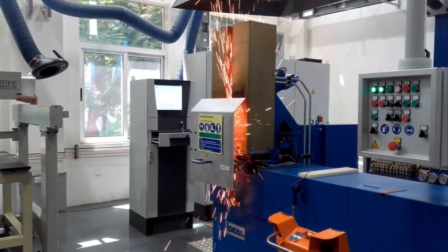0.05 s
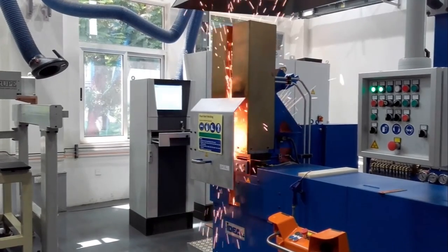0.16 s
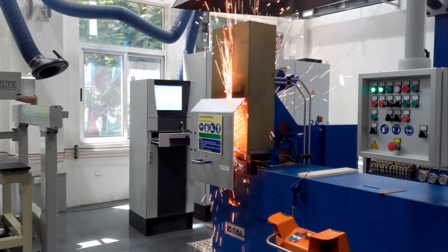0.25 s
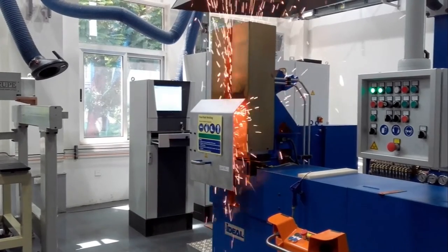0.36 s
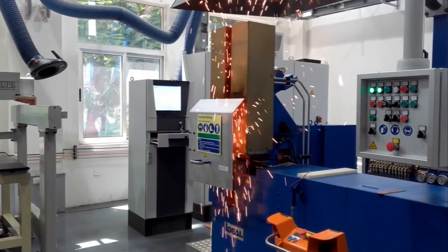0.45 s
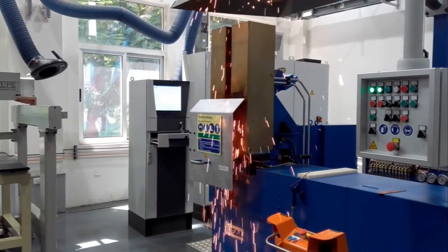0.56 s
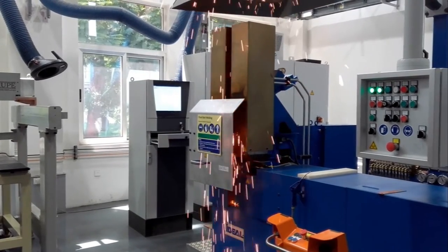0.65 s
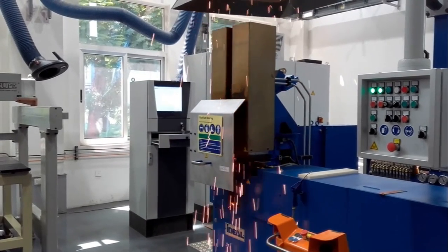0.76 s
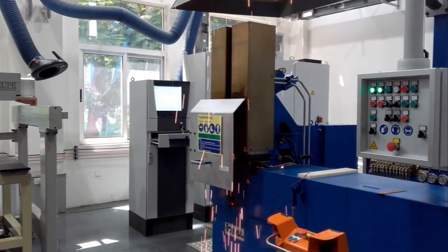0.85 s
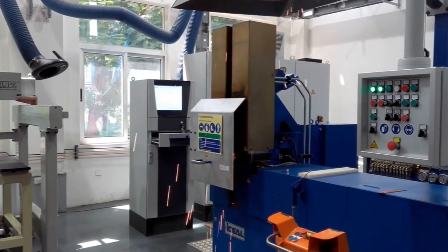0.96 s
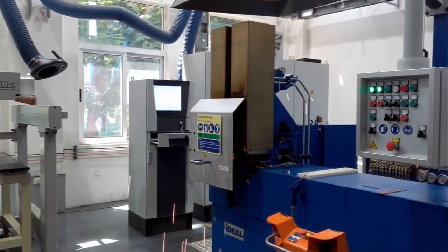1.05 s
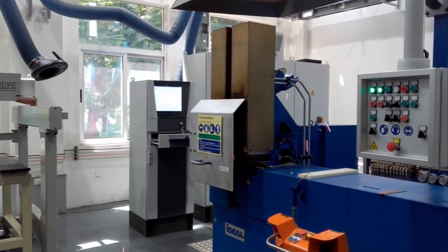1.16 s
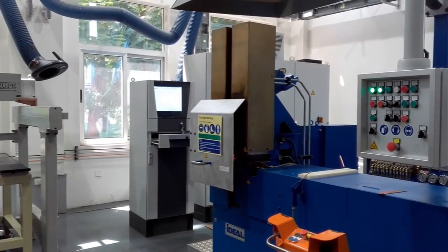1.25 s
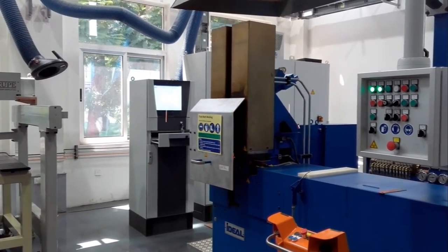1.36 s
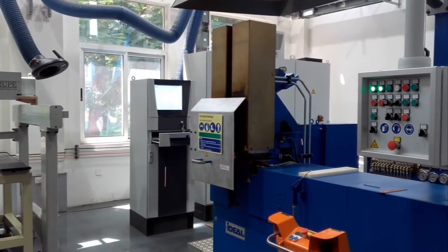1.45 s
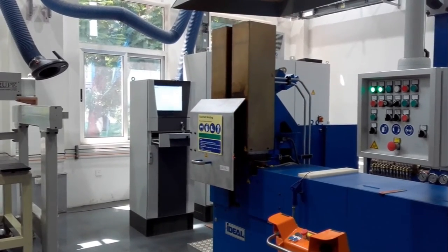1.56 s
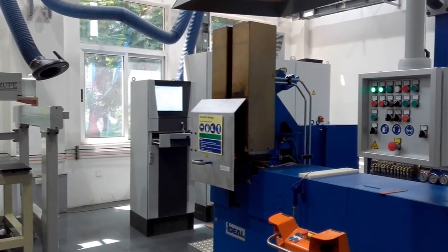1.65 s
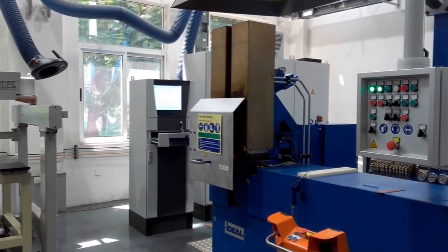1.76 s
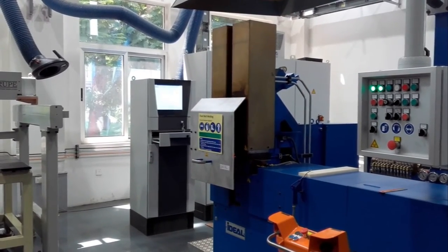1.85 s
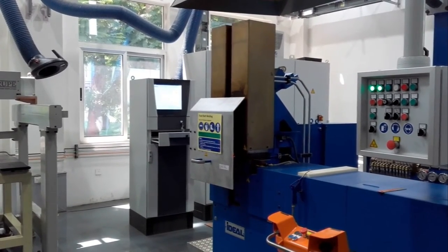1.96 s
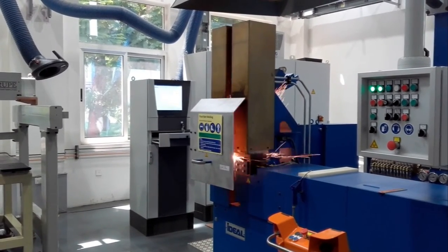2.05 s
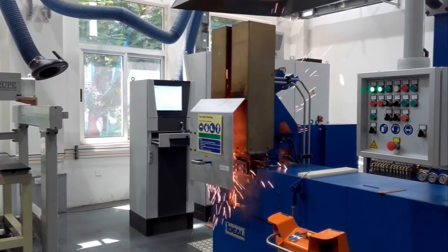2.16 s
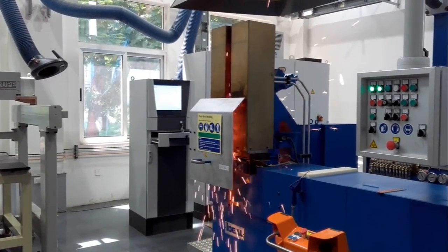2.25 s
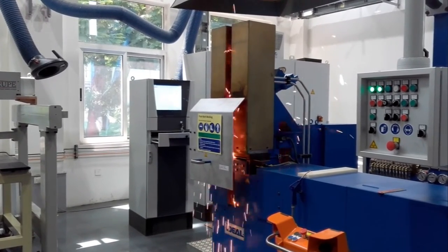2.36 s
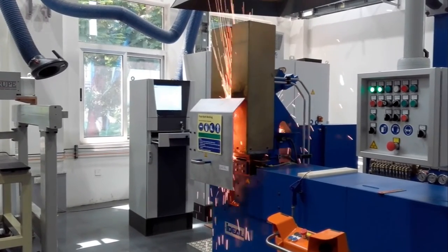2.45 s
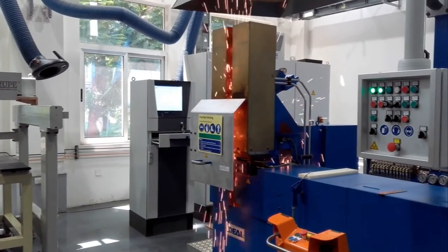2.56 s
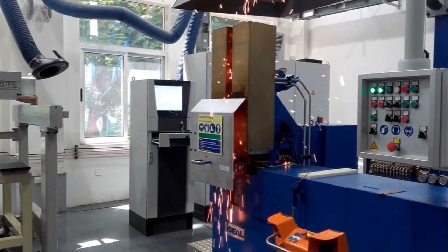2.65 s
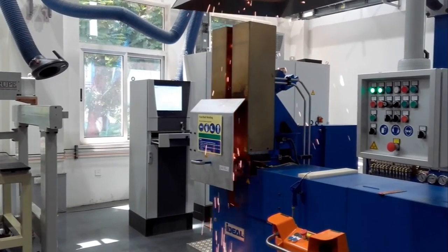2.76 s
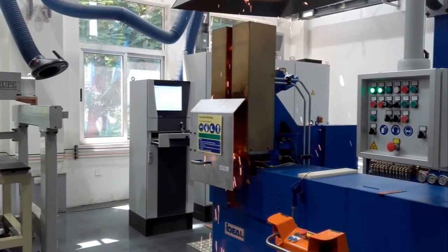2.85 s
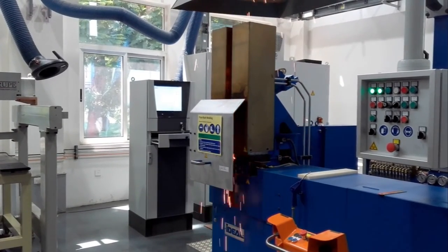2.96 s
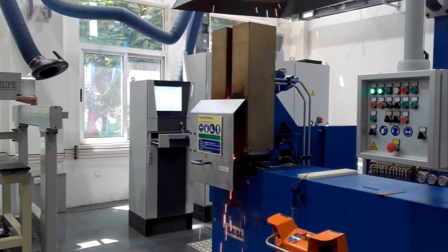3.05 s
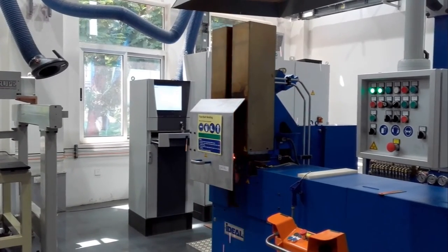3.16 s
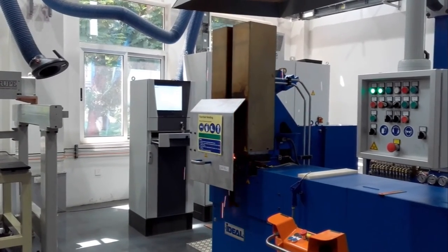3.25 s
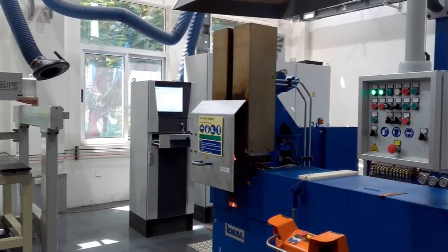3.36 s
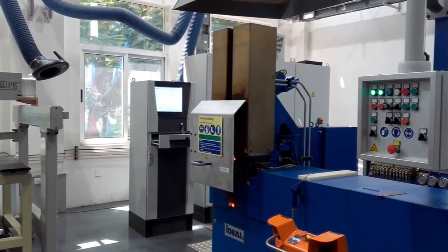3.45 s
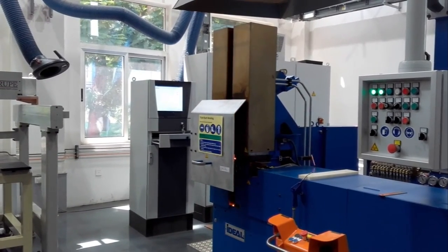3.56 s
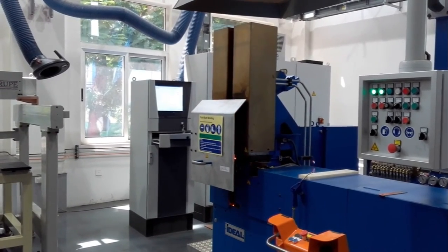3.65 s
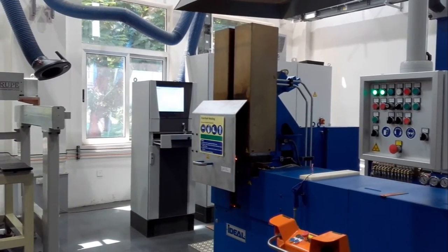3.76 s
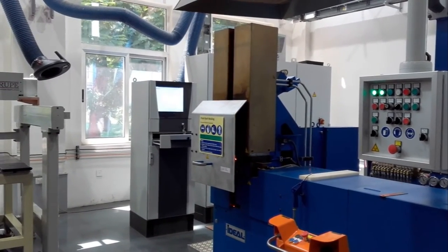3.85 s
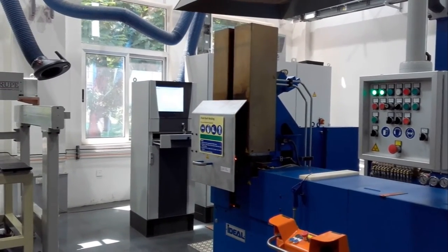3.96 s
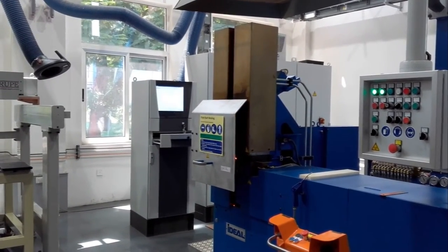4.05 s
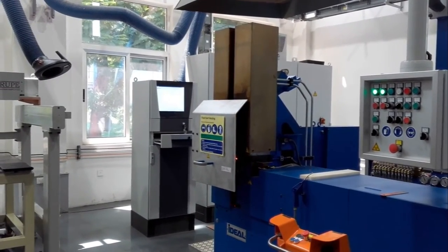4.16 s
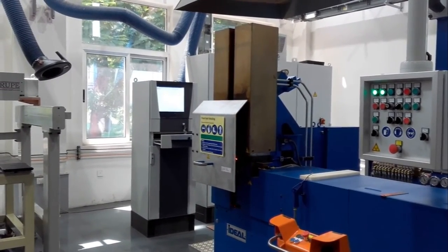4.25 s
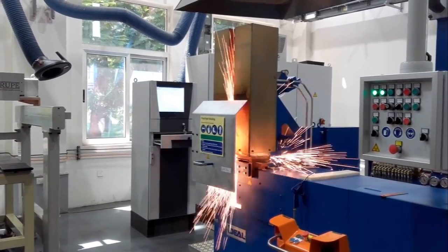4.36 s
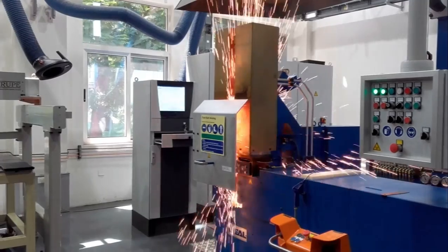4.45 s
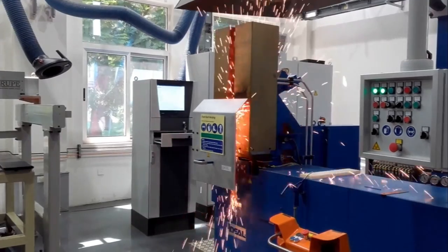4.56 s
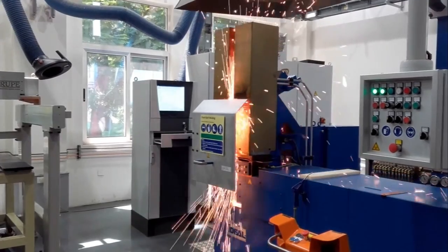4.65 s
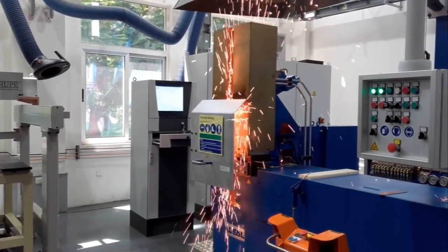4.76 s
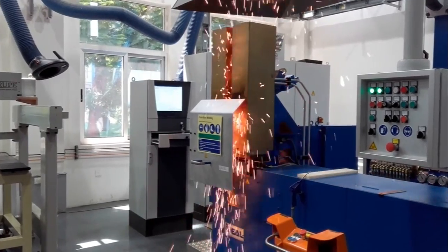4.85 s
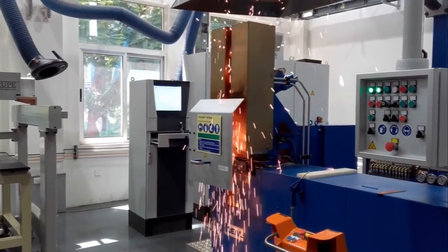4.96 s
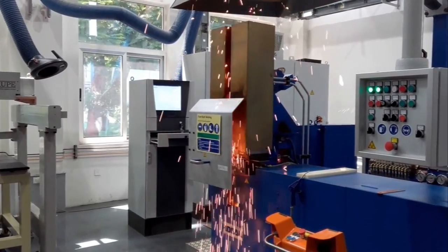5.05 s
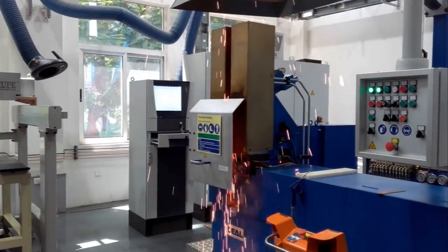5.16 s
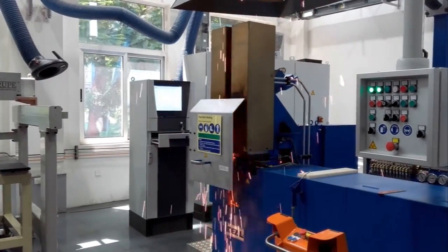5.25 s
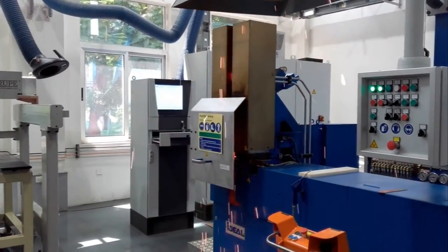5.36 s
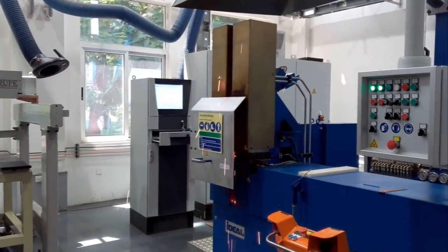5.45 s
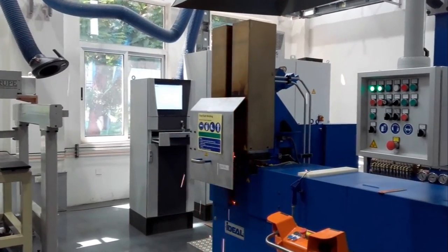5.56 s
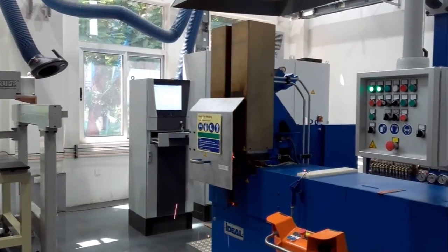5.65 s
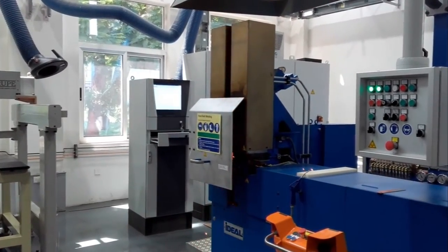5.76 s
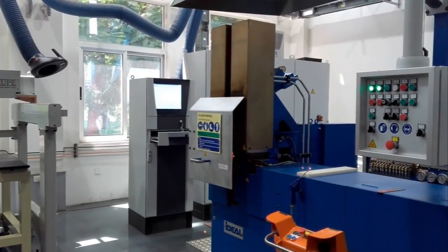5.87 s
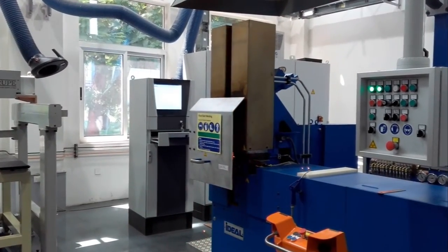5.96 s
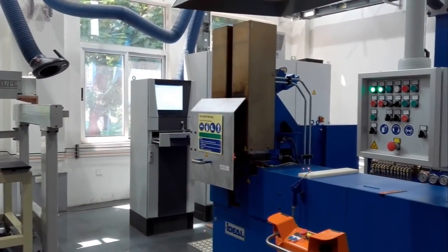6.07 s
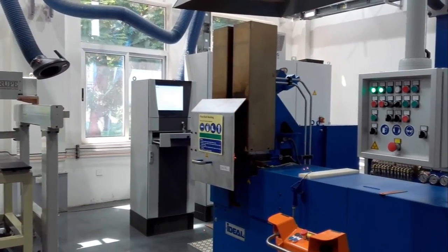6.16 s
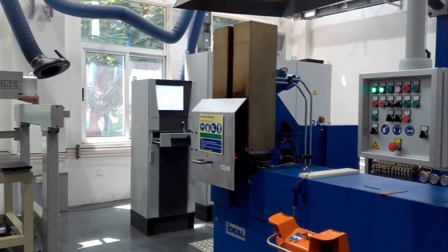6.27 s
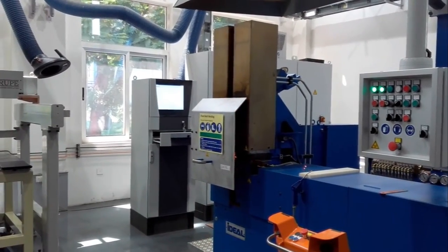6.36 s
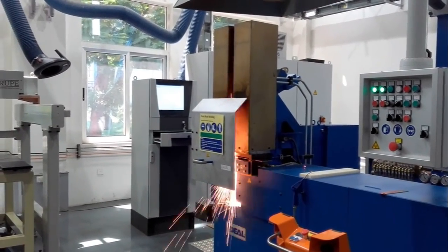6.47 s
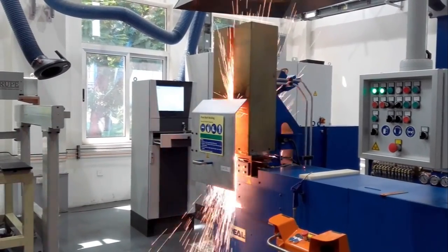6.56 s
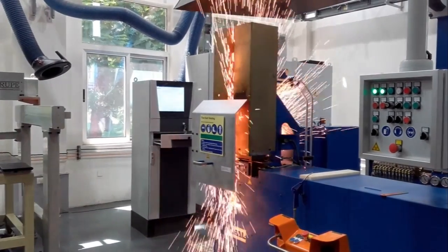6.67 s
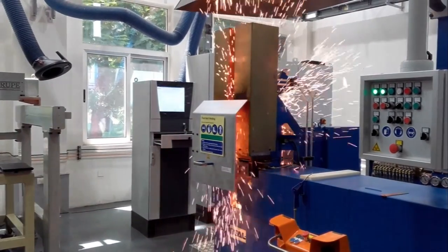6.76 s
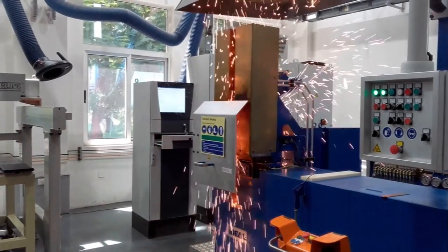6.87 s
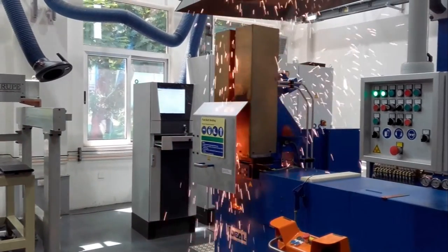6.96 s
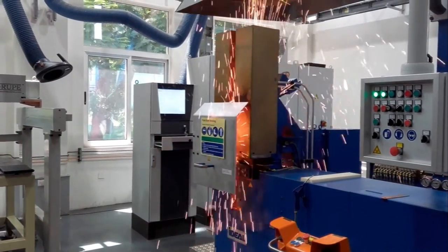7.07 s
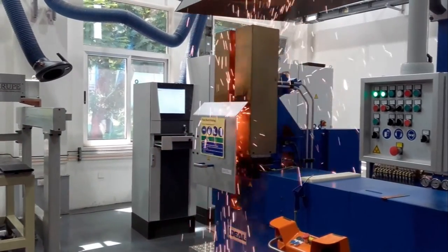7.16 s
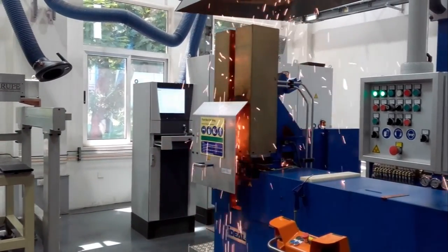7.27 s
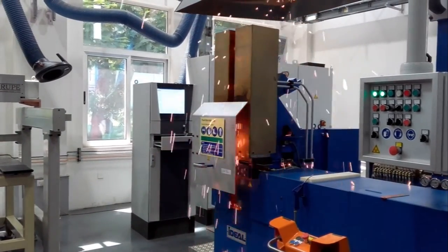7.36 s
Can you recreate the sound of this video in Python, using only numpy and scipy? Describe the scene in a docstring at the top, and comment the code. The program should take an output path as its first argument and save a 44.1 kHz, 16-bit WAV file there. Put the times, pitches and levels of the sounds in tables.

```python
"""A flash butt welder in a hard-walled lab: bridges of molten steel burst in salvos of filtered noise,
at 0-0.3 s, 2.1-3.0 s, 4.4-4.8 s and 6.5-7.1 s. In each, a bright sizzle comes first, then the sheet-metal
guard and the machine housing ring with the crackle; snaps, pops and spits are placed singly, as are rough
hoots of the machines, sines blurred by noise. A pump and motors whine as sines over ventilation noise; this
background swells quickly with the salvos and sinks back slowly."""
import sys
import numpy as np
from scipy import signal
from scipy.fft import rfft, irfft
from scipy.io import wavfile
from scipy.ndimage import uniform_filter1d

SR = 44100
rng = np.random.default_rng(int(sys.argv[2]) if len(sys.argv) > 2 else 0)


def log_audio(samples):
    """Write samples as a 16-bit WAV file to the path given in sys.argv[1]."""
    # one column per channel
    frames = np.atleast_2d(samples).T
    # limit to full scale, then quantise
    limited = np.clip(frames, -1, 1)
    pcm = np.round(limited * 32767).astype(np.int16)
    wavfile.write(sys.argv[1], SR, pcm)


N = 326781  # samples


def undb(db):
    """Decibels to gain."""
    return 10 ** (np.asarray(db) / 20)


def body(points, size=2048):
    """Minimum-phase response of unit energy with the (Hz, dB) colour, from the folded cepstrum."""
    hz, db = np.transpose(points)
    f_hz = np.maximum(np.arange(size // 2 + 1) * SR / size, 1)
    octaves_outside = np.log2(np.maximum(np.maximum(hz[0] / f_hz, f_hz / hz[-1]), 1))
    inside_db = np.interp(np.log(f_hz), np.log(hz), db)
    gain_db = np.maximum(inside_db - 150 * octaves_outside, -110)
    cepstrum = irfft(gain_db * np.log(10) / 20)
    cepstrum[1:size // 2] *= 2
    cepstrum[size // 2 + 1:] = 0
    response = irfft(np.exp(rfft(cepstrum)))
    return response / np.sqrt(np.sum(response ** 2))


def ring(x, response):
    """Sound x heard through a response, by convolution."""
    return signal.fftconvolve(x, response)[:N]


def walk(rate_hz):
    """Random levels held 1 / rate_hz s and slewed twice; spread 1."""
    k = int(SR / rate_hz)
    held = np.repeat(rng.standard_normal(N // k + 1), k)
    slewed = uniform_filter1d(uniform_filter1d(held, k), k)[:N]
    return slewed / slewed.std()


def narrow(hz, width_hz, size):
    """Noise of rms 1 around hz: smoothed complex noise shifted up to that pitch."""
    k = int(SR / width_hz)
    noise = rng.standard_normal((2, size + 2 * k))
    a, b = uniform_filter1d(uniform_filter1d(noise, k), k)[:, k:size + k]
    z = (a + 1j * b) * np.exp(2j * np.pi * hz * np.arange(size) / SR)
    return z.real / z.real.std()


def tone(hz, db, waver_db, drift_rad):
    """A sine of rms db before its level wavers; its phase drifts."""
    phase = 2 * np.pi * (hz * np.arange(N) / SR + rng.random()) + drift_rad * walk(4)
    return np.sqrt(2) * undb(db + waver_db * walk(12)) * np.sin(phase)


def strike(table, column, shapes):
    """One shape per row, placed at its time and scaled by the level in the column."""
    out = np.zeros(N + SR)
    for row, shape in zip(table, shapes):
        i = int(row[0] * SR)
        out[i:i + len(shape)] += undb(row[column]) * shape
    return out[:N]


def welder():
    """The same sputtering arc drives the air, the guard and the housing."""
    # colours of the five parts: (frequency [Hz], relative level [dB])
    fizz_colour = [(6650, -23), (11300, -13), (12500, 1.5), (13100, -2.5), (13900, 6.5), (15300, -4),
                   (16000, 0)]
    sizzle_colour = [(3880, -26), (6600, -4.5), (7350, 6), (7830, 1), (8330, 3), (8800, -2), (9870, 0.5),
                     (10400, -4), (10900, -11), (11400, -35), (14800, -39), (22000, -120)]
    guard_colour = [(2410, -21), (4100, -11), (4180, -14), (5020, -2.5), (5250, -0.5), (5480, -8),
                    (5850, 0), (6200, -4), (6510, -33), (6700, -14), (8710, -46), (14700, -120)]
    housing_colour = [(1030, -44.5), (1750, -26), (1820, -32), (1930, -14.5), (2160, -2.5), (2210, 0),
                      (2480, -4.5), (2670, -19.5), (2890, -6.5), (3160, -20.5), (3550, -19), (3800, -15.5),
                      (4200, -40), (5460, -43.5), (9240, -120)]
    thud_colour = [(470, -18.5), (800, -11.5), (1010, -10.5), (1070, -4), (1260, -3.5), (1390, 0),
                   (1580, -2), (1800, -14.5), (2340, -25), (3960, -120)]
    arc = walk(110)  # about one level per mains half-cycle
    fizz = salvo_gain(part=0) * crackle(4.1, 0.89 * arc + 0.64 * walk(300))
    sizzle = salvo_gain(part=1) * crackle(3.5, 0.84 * arc + 1.0 * walk(300))
    guard = salvo_gain(part=2) * crackle(0.64, 0.73 * arc + 1.7 * walk(200))
    hiss = ring(fizz, body(fizz_colour)) + ring(sizzle, body(sizzle_colour)) + ring(guard, body(guard_colour))
    hiss = patchy(hiss)
    housing = salvo_gain(part=3) * crackle(1.06, 1.3 * arc + 1.3 * walk(45))
    thud = salvo_gain(part=4) * crackle(1.5, 1.6 * arc)
    driven = [(snaps(1, t60_s=0.025), fizz_colour), (snaps(2, t60_s=0.066), sizzle_colour),
              (snaps(3, t60_s=0.032), guard_colour), (housing, housing_colour), (thud, thud_colour)]
    return hiss + sum(ring(x, body(colour)) for x, colour in driven) + pops() + spits()


def salvo_gain(part):
    """Gain of one part: it rises, holds while the salvo burns, then fades at its own rate."""
    # salvos of sparks: (start [s], burn [s], fizz, sizzle, guard, housing, thud level [dB])
    salvo_table = [(.004, .01, -27, -36, -25, -22.5, -33.5), (0.023, 0.053, -29, -30, -29.5, -11.5, -26.5),
                   (0.291, 0.033, -30.5, -36, -35, -22.5, -46),
                   (2.102, 0.064, -33, -37.5, -41.5, -33.5, -46),
                   (2.494, .01, -31, -35.5, -38.5, -29.5, -31.5), (2.958, .002, -51, -49.5, -35, -36, -53),
                   (4.36, .02, -38, -52, -50, -42, -49), (4.386, 0.043, -33, -35.5, -36, -28.5, -42),
                   (4.425, 0.077, -31, -31, -22, -12.5, -33), (4.724, 0.079, -25, -28.5, -23, -22.5, -36),
                   (6.52, 0.028, -30, -35, -29, -28, -57), (6.561, 0.092, -29, -29.5, -20.5, -12.5, -30),
                   (7.085, .002, -37.5, -47, -47, -31, -40)]
    # fizz to thud, deep parts come late and stay: (rise [s], fade [dB/s])
    part_table = [(.002, 240), (.003, 186), (.006, 146), (.008, 105.5), (.04, 37)]
    knee_s = 0.031  # the burn rounds over into the fade
    t = np.arange(N) / SR
    rise_s, fade_db_s = part_table[part]
    gain = np.zeros(N)
    for start, burn, *db in salvo_table:
        late = t - start - burn
        faded_s = (late + np.hypot(late, knee_s)) / 2
        gain += np.clip((t - start) / rise_s, 0, 1) * undb(db[part] - fade_db_s * faded_s)
    return gain


def crackle(grain_db, sputter_db):
    """Dense spark noise of rms 1: a few samples stand out, and its level follows sputter_db."""
    grain = np.minimum(rng.exponential(size=N), 5)
    x = rng.standard_normal(N) * undb(grain_db * grain + sputter_db)
    return x / np.sqrt(np.mean(x ** 2))


def patchy(x, depth_db=3.5, size=256):
    """Narrow bands of the hiss break up on their own, in patches some 500 Hz wide and 26 ms long."""
    z = signal.stft(x, nperseg=size)[2]
    field = rng.standard_normal(z.shape)
    field = uniform_filter1d(uniform_filter1d(field, size=3, axis=0), size=9, axis=1)
    gain = undb(depth_db * field / field.std())
    gain /= np.sqrt(np.mean(gain ** 2))
    return signal.istft(z * gain, nperseg=size)[1][:N]


def snaps(column, t60_s):
    """Bright snaps of the arc: sharp puffs of noise that fall 60 dB in t60_s."""
    # (time [s], fizz level [dB], sizzle level [dB], guard level [dB])
    snap_table = [(0.0044, -21, -24, -24), (0.0248, -22, -38, -22), (0.2932, -24, -42, -36),
                  (0.2984, -21, -32, -41), (2.1026, -33, -51, -44), (2.116, -30, -36, -40),
                  (2.498, -22, -31, -35), (2.9594, -43, -35.5, -41), (3.0974, -56, -61, -51),
                  (4.3735, -28, -39, -41), (4.387, -26, -43, -35), (4.4134, -25, -25, -27),
                  (4.4347, -15, -34, -18), (4.4682, -19, -33, -25), (4.728, -20, -22, -14),
                  (4.7571, -20, -35, -36), (6.5236, -15.5, -28, -28), (6.552, -27, -31, -30),
                  (6.5665, -21, -36, -18), (6.595, -20, -38, -25), (6.6274, -24, -29, -13.5),
                  (7.0862, -25, -45, -44)]
    t = np.arange(SR // 8) / SR
    noise = rng.standard_normal((len(snap_table), len(t)))
    return strike(snap_table, column, noise * undb(-60 * t / t60_s))


def pops(rise_s=0.0027, spread=0.109):
    """Single bridges knock the housing, which rings briefly on two close pitches."""
    # (time [s], level [dB])
    pop_table = [(0.0268, 2), (0.0354, -9), (0.0464, -4), (0.0564, -4), (0.0677, -2.5), (0.0784, -3),
                 (0.0844, -8), (0.1024, -4), (0.1274, -10), (0.17, -4), (0.197, -14), (0.2094, -9.5),
                 (0.2947, -5), (0.3044, -6.5), (0.3144, -12), (0.3496, -12), (0.3596, -15), (0.4095, -9),
                 (4.4159, -16), (4.4263, -4), (4.4345, -6), (4.4414, -6), (4.4682, -13), (4.476, -7),
                 (4.4894, -6), (4.519, -19), (4.5466, -6), (4.5644, -5), (4.609, -16), (4.7521, -16),
                 (4.778, -14), (4.798, -15), (4.8204, -17), (6.568, -16), (6.5799, -10), (6.6094, -14),
                 (6.6174, -1), (6.6295, -5), (6.6573, 0), (6.6664, -5), (6.7054, -9), (6.7211, -4.5),
                 (6.7476, -9), (6.788, -16)]
    pop_hz, scatter = 2255, 0.038  # scatter as a share of the pitch
    t = np.arange(SR // 40) / SR
    chance = rng.random((len(pop_table), 4))
    hz = pop_hz * (1 + scatter * (2 * chance[:, 3:] - 1))
    near_hz = hz * (1 + spread * (2 * chance[:, 1:2] - 1))
    main = np.sin(2 * np.pi * (hz * t + chance[:, :1]))
    near = np.sin(2 * np.pi * (near_hz * t + chance[:, 2:3]))
    envelope = (t / rise_s * np.exp(1 - t / rise_s)) ** 2
    return strike(pop_table, 1, (0.57 * main + 0.26 * near) * envelope)


def spits(width_hz=420):
    """Coloured spits of flying metal: narrow hisses with a quick start and exponential decay."""
    # (time [s], level [dB], pitch [Hz], t60 [s])
    spit_table = [(0.024, -22, 5300, 0.046), (.293, -15, 3900, 0.055), (.31, -34, 8600, .3),
                  (2.115, -27, 4900, 0.13), (2.5, -28, 12800, 0.3), (2.958, -27, 14000, .07),
                  (3.092, -46, 14800, .08), (7.085, -28, 14400, 0.15), (4.382, -18.5, 5000, 0.45),
                  (4.435, -2, 3700, 0.028), (0.069, -10, 3200, 0.12), (6.59, -17, 3000, .2),
                  (4.728, -7.5, 5160, 0.1), (4.89, -53, 10100, .2), (6.522, -27, 4300, 0.043)]
    t = np.arange(SR // 4) / SR
    attack = np.minimum(t / 0.002, 1)
    shapes = [.5 * narrow(hz, width_hz, len(t)) * attack * undb(-60 * t / t60_s)
              for _, _, hz, t60_s in spit_table]
    return strike(spit_table, 1, shapes)


def hoots(pure=0.56, share=.1, blur_db=-4.0):
    """Short rough hoots and squeaks of the machines: a tone blurred by noise around it rises and fades."""
    # (start [s], length [s], pitch [Hz], level [dB])
    hoot_table = [(0.184, 0.2, 635, -39), (1.287, 0.074, 903, -46), (2.32, 0.21, 655, -40.5),
                  (2.43, 0.076, 604, -35.5), (2.466, 0.08, 706, -34), (2.53, 0.056, 1530, -30),
                  (2.578, 0.06, 1400, -30), (2.601, .045, 1515, -30), (3.49, 0.05, 3630, -45),
                  (3.513, 0.069, 3400, -46), (3.559, 0.051, 1036, -42.5), (6.876, 0.17, 1390, -32.5),
                  (6.957, 0.15, 612, -40.5), (6.98, 0.14, 696, -33), (7.117, 0.09, 1390, -35)]
    t = np.arange(N) / SR
    out = np.zeros(N)
    for start, length, hz, db in hoot_table:
        rough = pure * tone(hz, db, 1.3, 1.75) + undb(db + blur_db) * narrow(hz, share * hz, N)
        out += rough * np.sin(np.pi * np.clip((t - start) / length, 0, 1))
    return out


def pump():
    """Gear teeth whine at multiples of the mesh rate; steady tones and a feed motor hum beside them."""
    # gear whine, levels ahead of the swell: (multiple of the mesh rate [1], level [dB])
    mesh_table = [(2, -58), (3, -66), (4, -51.5), (5, -72), (7, -64), (8, -54.5), (9, -58), (10, -67),
                  (12, -62.5), (13, -66.5), (14, -58), (15, -83), (16, -68.5), (17, -67), (18, -66.5),
                  (19, -72), (20, -64.5), (21, -67.5), (22, -67), (24, -82), (26, -77.5), (27, -76.5)]
    # other steady tones, levels ahead of the swell: (frequency [Hz], level [dB])
    hum_table = [(238, -84), (301.5, -71.5), (474, -81), (599, -69.5), (711, -68.5), (1518, -60),
                 (1610, -60)]
    # feed motor spells, levels ahead of the swell: (start [s], end [s], level [dB])
    feed_table = [(0.407, 1.28, -59.5), (2.315, 3.36, -58), (4.797, 5.61, -58.5), (7.122, 7.41, -57.5)]
    mesh_hz, feed_hz, feed_waver_db = 272.15, 712, 1.8
    t = np.arange(N) / SR
    mesh = sum(tone(k * mesh_hz, db, 0.97, 0.071 * k) for k, db in mesh_table)
    feed_gain = sum(undb(db) * np.interp(t, [a - .05, a, b, b + 0.068], [0, 1, 1, 0])
                    for a, b, db in feed_table)
    hum = sum(tone(hz, db, 0.85, 1.57) for hz, db in hum_table)
    return mesh + hum + feed_gain * tone(feed_hz, 0, feed_waver_db, 0.51)


def ventilation():
    """Broad air noise whose three ranges flutter a little."""
    # colours of the ranges: (frequency [Hz], relative level [dB])
    low_colour = [(24, -96), (40, -52), (168, -37.5), (231, -28.5), (266, -18.5), (293, -24), (503, -18),
                  (536, -14), (671, -9), (825, -10), (952, -9.5), (1120, -6), (1270, -9), (1560, -3.5),
                  (1800, -16), (2340, -56), (3960, -120)]
    mid_colour = [(1750, -18), (1820, -14), (1910, -7), (2100, -2), (2430, 0.5), (2650, -9.5),
                  (3350, -10.5), (3830, -4.5), (4050, -17.5), (4160, -30), (4400, -20.5), (5200, -13),
                  (5500, -18), (5900, -15), (6300, -27.5), (6600, -42)]
    top_colour = [(3820, -36), (6500, -6), (6720, -7), (6820, -4), (7350, -4.5), (7960, -5.5), (9040, -9.5),
                  (10200, -15), (11000, -23), (11500, -35), (12600, -11), (13300, -18.5), (14000, -15),
                  (15900, -22)]
    # low, mid, top: level ahead of flutter and swell [dB]
    range_db = [-48.5, -43.5, -72]
    return sum(undb(db + 0.7 * walk(9)) * ring(rng.standard_normal(N), body(colour))
               for colour, db in zip((low_colour, mid_colour, top_colour), range_db))


def swell():
    """Gain of the background: up fast with the salvos, held, then sinking to rest."""
    # (start [s], hold until [s], gain [dB])
    swell_table = [(0, 0.513, 11.5), (2.07, 2.743, 9.7), (2.91, 3.02, 8.5), (4.336, 4.955, 12),
                   (6.523, 7.17, 11)]
    rise_db_s, fall_db_s, rest_db = 79, 15.5, 2
    t = np.arange(N) / SR
    steps_db = [np.minimum(rise_db_s * (t - a), db - fall_db_s * np.maximum(t - b, 0))
                for a, b, db in swell_table]
    return undb(np.maximum(np.max(steps_db, axis=0), rest_db))


def scene():
    """Welder and hoots in front of the swelling background."""
    background = swell() * (ventilation() + pump())
    return (welder() + background + hoots())[None]


def record(dry):
    """The microphone drops the deep bass, peaks clip at full scale and the top is cut."""
    top_hz = 15880
    bass_cut = signal.butter(2, 70, "high", fs=SR, output="sos")
    top_cut = signal.ellip(12, .2, 85, top_hz, fs=SR, output="sos")
    thin = signal.sosfilt(bass_cut, dry)
    return signal.sosfilt(top_cut, np.clip(thin, -1, 1))


dry = scene()
out = record(dry)
log_audio(out)
```